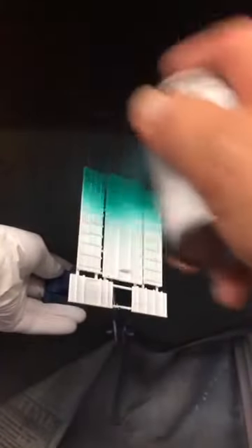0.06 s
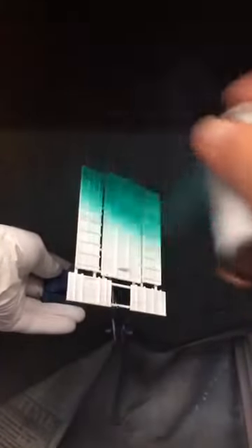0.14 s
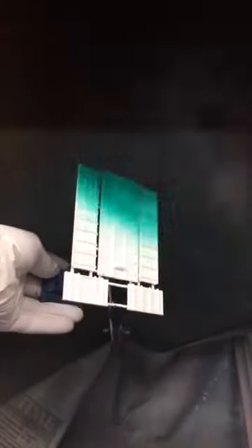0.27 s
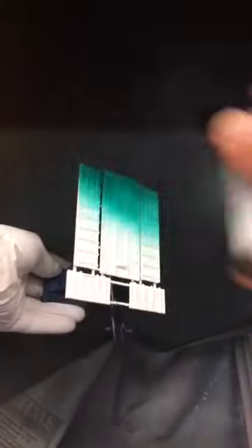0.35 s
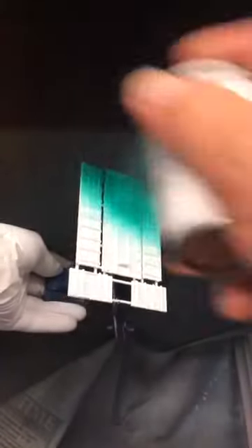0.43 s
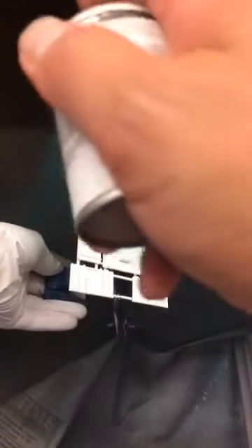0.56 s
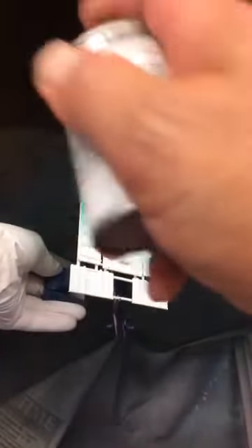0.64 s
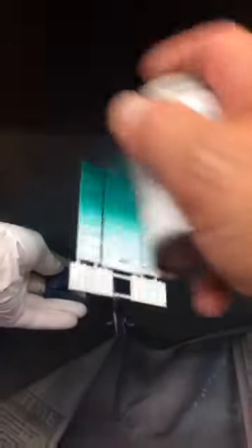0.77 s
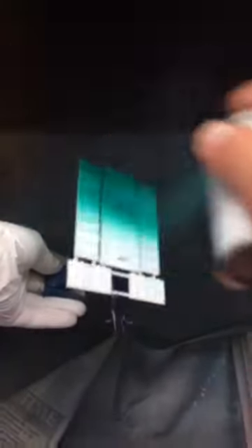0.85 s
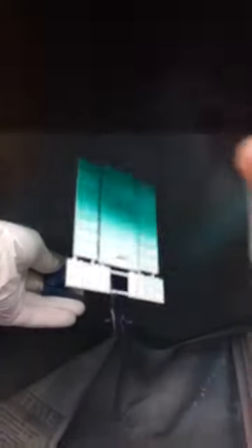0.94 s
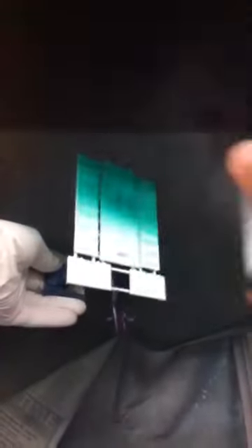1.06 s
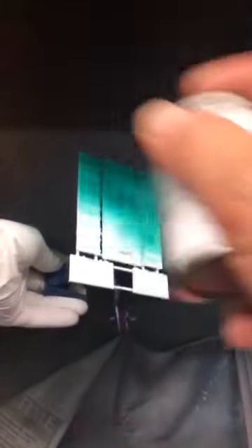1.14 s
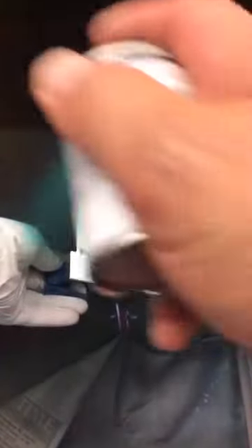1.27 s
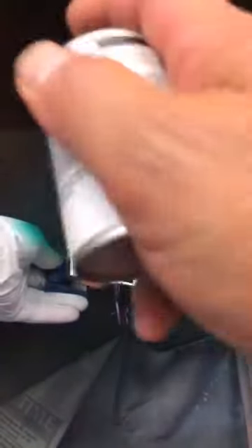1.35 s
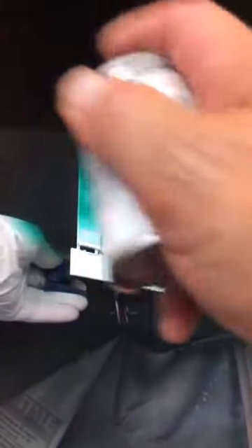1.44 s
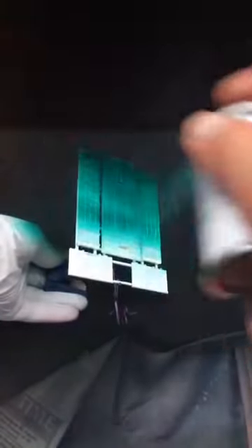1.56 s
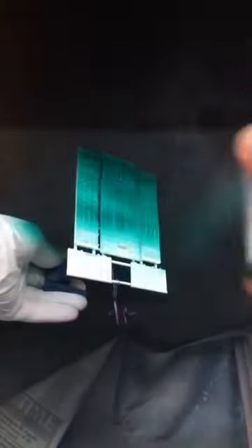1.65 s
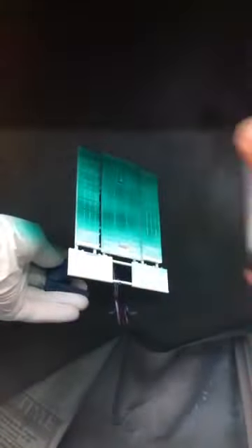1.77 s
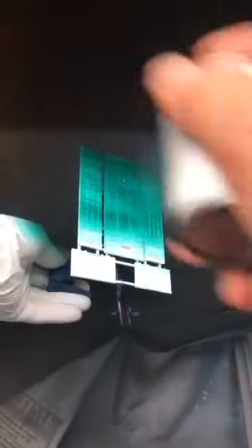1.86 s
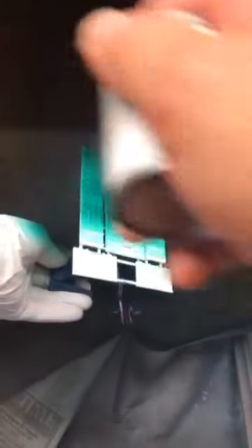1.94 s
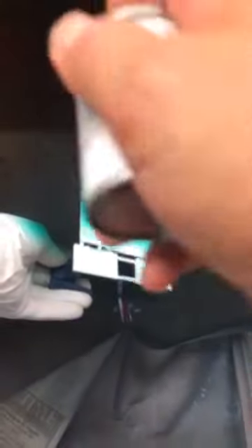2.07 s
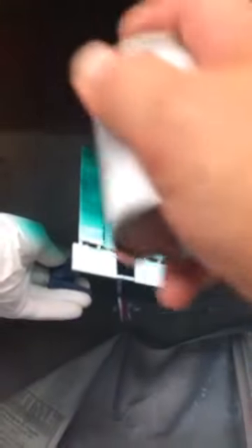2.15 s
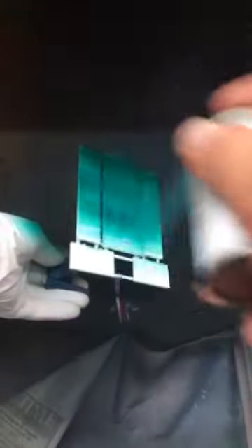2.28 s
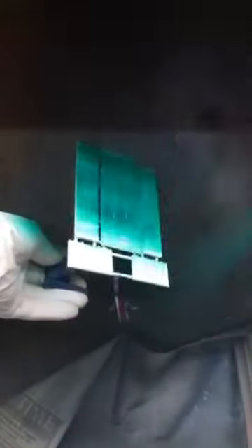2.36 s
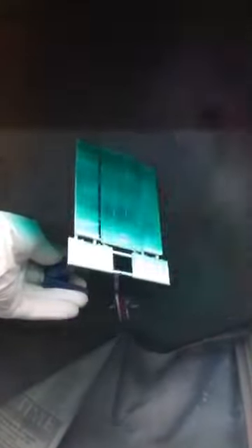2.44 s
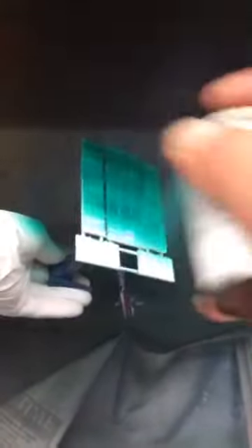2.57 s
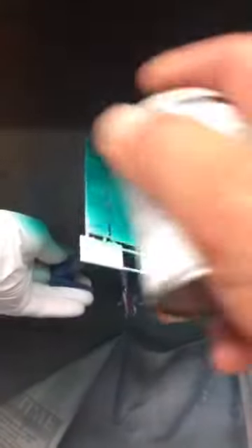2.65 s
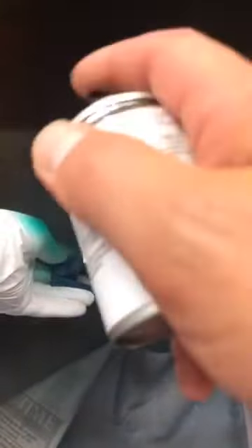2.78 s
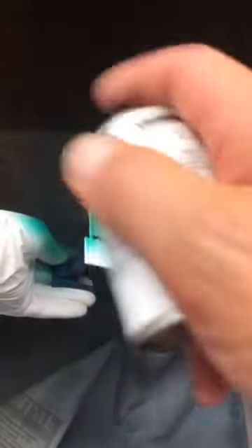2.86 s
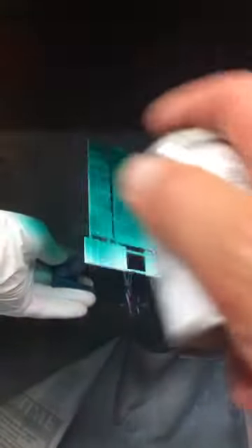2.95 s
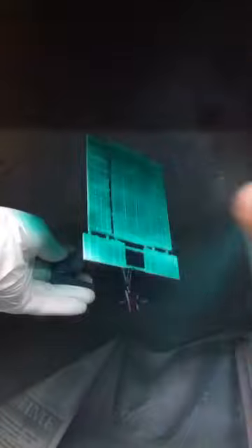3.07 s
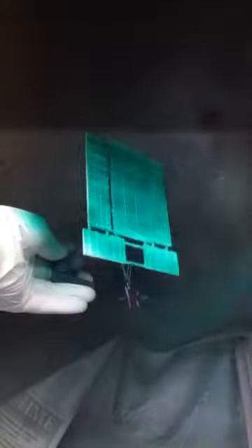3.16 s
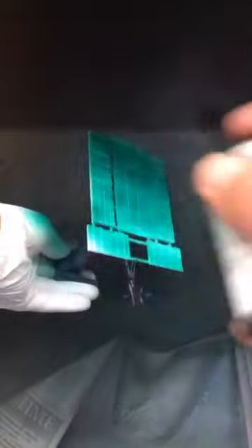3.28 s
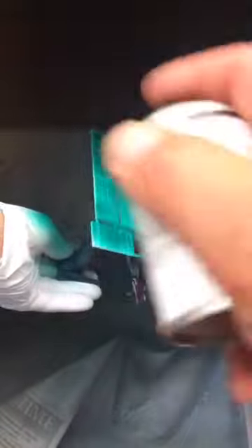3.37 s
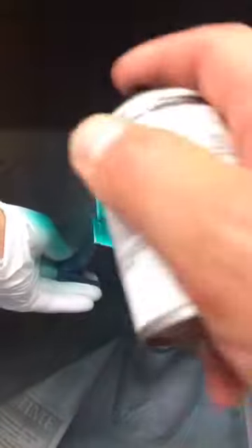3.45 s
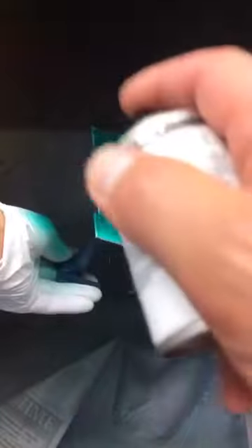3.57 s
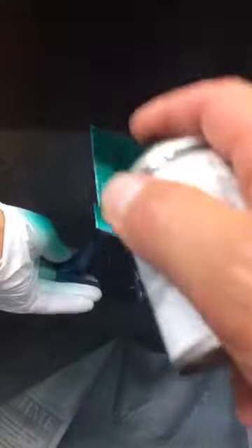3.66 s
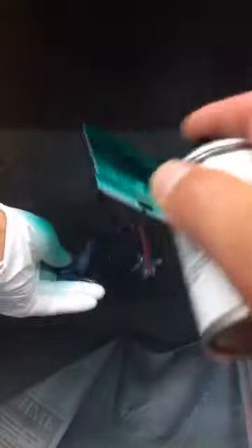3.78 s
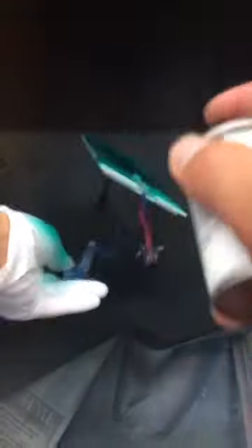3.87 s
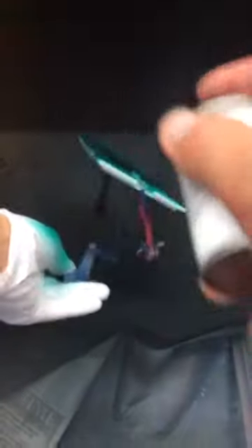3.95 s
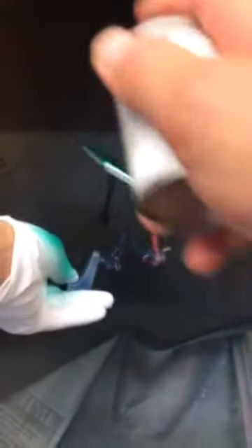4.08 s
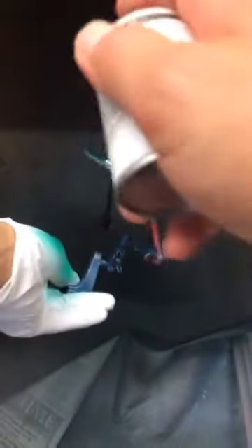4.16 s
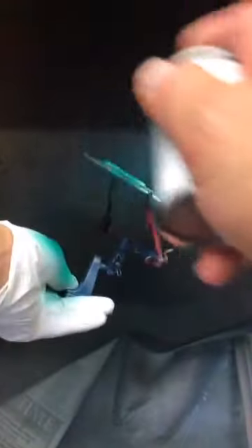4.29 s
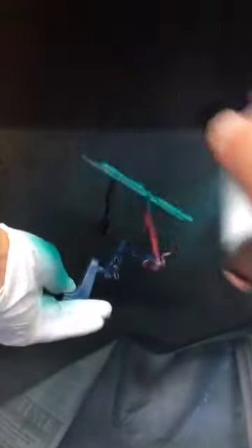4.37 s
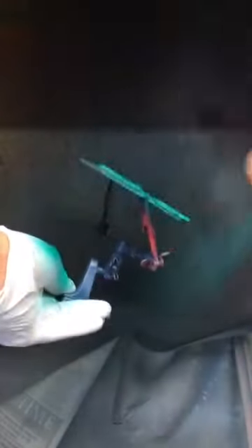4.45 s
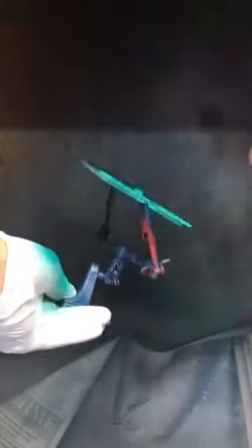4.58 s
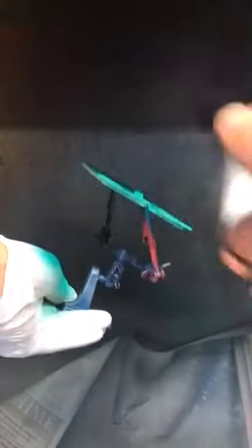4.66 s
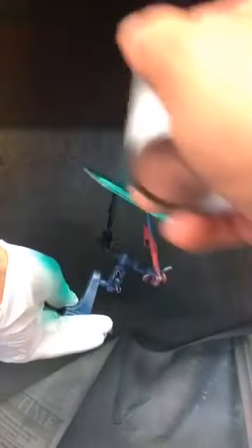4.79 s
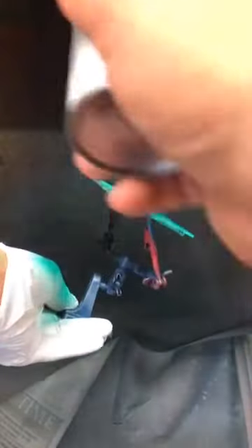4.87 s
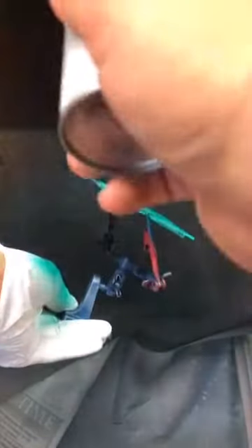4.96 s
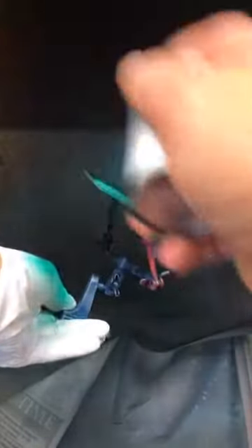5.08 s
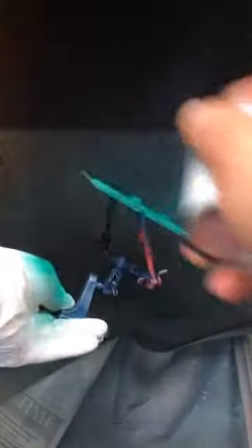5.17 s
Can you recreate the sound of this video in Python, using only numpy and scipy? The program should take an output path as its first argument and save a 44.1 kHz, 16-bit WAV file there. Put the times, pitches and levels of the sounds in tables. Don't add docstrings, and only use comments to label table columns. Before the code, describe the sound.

An aerosol paint can fires quick, even hissing bursts close by in a small booth, pausing once, over faint fan hum and distant bird whistles.

```python
import sys
import numpy as np
from scipy import signal
from scipy.fft import rfft, irfft, next_fast_len
from scipy.io import wavfile
from scipy.ndimage import uniform_filter1d, map_coordinates

SR = 44100
rng = np.random.default_rng(int(sys.argv[2]) if len(sys.argv) > 2 else 0)


def master_out(mix):
    frames = np.transpose(np.atleast_2d(mix))
    ceiling = np.clip(frames, -1, 1)
    pcm = np.round(ceiling * 32767).astype(np.int16)
    wavfile.write(sys.argv[1], SR, pcm)


def voltage_ratio(level):
    return 10 ** (np.asarray(level, float) / 20)


N = 230378

# (valve half open [s], valve half shut [s], jet hiss [dB],
# leak before opening, relative to the hiss [dB], swell over the pass [dB])
SPRAY_PRESSES = [(0.019, .235, -38, -48, -7), (0.382, 0.603, -37.5, -45, -0.5),
                 (0.766, .99, -38.5, -26, -4), (1.108, 1.341, -37.5, -41, 1.5),
                 (1.491, 1.717, -39, -45, -2.5), (1.846, 2.02, -38, -20, -0.8),
                 (2.219, 2.42, -39, -45, -3.5), (2.549, 2.747, -36.5, -25, 1.5),
                 (2.931, 3.159, -38, -18.5, -4.5), (3.296, 3.46, -36, -18, -0.5),
                 (4.195, 4.529, -38.5, -26, -2.8), (4.686, 4.891, -40.5, -30, 0.2),
                 (5.075, 5.27, -40.5, -45, -2.8)]
LEAK_S, LEAK_RISE_S = 0.02, 0.0042


def unit(x):
    return x / np.sqrt(np.mean(x ** 2) + 1e-20)


def along(points, hz):
    f, v = np.transpose(points)
    return np.interp(np.log(hz + 1), np.log(f + 1), v)


def wobble(rate):
    knots = rng.standard_normal(int(N * rate / SR) + 4)
    return map_coordinates(knots, [np.arange(N) * rate / SR])


def bumps(rows):
    t = np.arange(N) / SR
    power = sum(voltage_ratio(2 * db) * np.exp(-((t - s) / width) ** 2) for s, width, db in rows)
    return np.sqrt(power)


def filtered(x, response):
    m = next_fast_len(N + 8192)
    gain = response(np.fft.rfftfreq(m, 1 / SR))
    return irfft(rfft(x, m) * gain, m)[..., :N]


def rush(spectrum, patchy_db, grain_db=0):
    grains = rng.standard_normal(N) * voltage_ratio(grain_db * wobble(900))
    z = signal.stft(grains, nperseg=512)[2]
    patches = uniform_filter1d(rng.standard_normal(z.shape), size=5, axis=0)
    patches = uniform_filter1d(patches, size=7, axis=1)
    x = signal.istft(z * voltage_ratio(patchy_db * unit(patches)), nperseg=512)[1][:N]
    return unit(filtered(x, lambda hz: voltage_ratio(along(spectrum, hz))))


def tail(decay, seconds):
    hz, t, z = signal.stft(rng.standard_normal(int(seconds * SR)), SR, nperseg=256)
    fade_db = -60 * t / along(decay, hz)[:, None]
    x = signal.istft(z * voltage_ratio(fade_db), SR, nperseg=256)[1]
    return x / np.linalg.norm(x)


def fan():
    # (frequency [Hz], rms level [dB])
    motor_lines = [(120, -86.5), (138, -81.5), (360, -92), (480, -82.5), (585, -85.5), (720, -86),
                   (840, -94.5), (1080, -86.5), (1200, -88), (1320, -100)]
    # (frequency [Hz], density [dB per Hz])
    air_colour = [(15, -68), (25, -49), (80, -9.5), (107, -7.5), (188, -15), (227, -6.5), (390, -7),
                  (471, -10), (510, -14.5), (807, -13), (1240, -19.5), (1350, -13.5), (2070, -22.5),
                  (14000, -31), (15600, -43)]
    t = np.arange(N) / SR
    hum = np.zeros(N)
    for hz, db in motor_lines:
        gain = voltage_ratio(db + 2.5 + 1.3 * wobble(4.7))
        hum += gain * np.sin(2 * np.pi * hz * t + 0.34 * wobble(7.2))
    air_db = -70 + 0.8 * wobble(5.12)
    return hum + voltage_ratio(air_db) * rush(air_colour, patchy_db=1.5)


def bird():
    # (start [s], length [s], start pitch [Hz], end pitch [Hz], level [dB])
    whistles = [(0.173, 0.067, 1830, 1724, -55.5), (.255, 0.044, 1980, 1960, -67),
                (0.24, 0.07, 1700, 1610, -63), (.30, .1, 1610, 1566, -63), (.66, 0.1, 1050, 1150, -72),
                (1.30, 0.12, 980, 1000, -65), (1.415, 0.062, 1330, 1417, -69),
                (2.0, 0.085, 1500, 1580, -56), (2.105, 0.11, 1580, 1510, -64.5),
                (2.21, 0.048, 1500, 1500, -57), (2.291, 0.062, 1600, 1670, -63),
                (2.38, 0.062, 1724, 1715, -59), (2.46, 0.09, 1625, 1540, -64.5),
                (2.57, 0.043, 1484, 1520, -56), (3.08, 0.074, 1495, 1590, -52.5),
                (3.173, 0.13, 1578, 1517, -66), (3.415, 0.045, 1480, 1470, -57),
                (3.49, 0.064, 1516, 1550, -57.5), (3.58, 0.09, 1570, 1530, -70.5),
                (3.679, 0.077, 1550, 1567, -71), (3.654, .09, 925, 965, -66.5),
                (3.745, 0.045, 955, 935, -68), (3.81, 0.045, 954, 975, -75)]
    x = np.zeros(N + SR)
    for s, length, start_hz, end_hz, db in whistles:
        u = np.arange(int(length * SR)) / (length * SR)
        glide_hz = start_hz + (end_hz - start_hz) * u
        hz = glide_hz * (1 + 0.022 * np.sin(2 * np.pi * 65 * u * length))
        swell = np.sin(np.pi * u ** 0.45) ** 0.67
        note = np.sin(2 * np.pi * np.cumsum(hz) / SR) * swell
        note = note * (1 + 0.35 * np.sin(2 * np.pi * 55 * u * length))
        echo = signal.fftconvolve(note, tail([(900, 0.65), (2000, 0.5)], seconds=0.6))
        call = 0.6 * echo + 1.02 * np.pad(note, (0, len(echo) - len(note)))
        x[round(s * SR):][:len(call)] += voltage_ratio(db + 1.4 * wobble(45)[:len(call)]) * call
    return x[:N]


def hand():
    # (time [s], width [s], level [dB])
    glove_rubs = [
        (3.59, .02, -90),
        (3.785, .03, -77),
        (3.826, .006, -77),
        (3.859, 0.0044, -70),
        (3.91, .015, -77),
        (4.165, 0.034, -74),
    ]
    # (time [s], peak level [dB], pitch [Hz])
    clamp_ticks = [
        (3.5914, -66, 8900),
        (3.8262, -62, 7630),
        (3.8586, -66, 5800),
        (3.858, -62, 1700),
        (3.9114, -72, 8900),
        (3.9314, -67, 7790),
        (4.1514, -68, 7770),
    ]
    # (frequency [Hz], density [dB per Hz])
    skin = [(900, -120), (1500, 0), (5000, -11), (10000, -12), (15500, -22)]
    x = bumps(glove_rubs) * voltage_ratio(2.9 * wobble(60)) * rush(skin, patchy_db=-3, grain_db=0)
    t = np.arange(400) / SR
    for s, db, hz in clamp_ticks:
        tick = 0.66 * np.sin(2 * np.pi * hz * t) + 0.6 * rng.standard_normal(len(t))
        x[round(s * SR):][:len(t)] += voltage_ratio(db - 0.5 - 60 * t / 0.012) * tick
    return x


def booth(x):
    # (frequency [Hz], time to fall 60 dB [s])
    wall_decay = [(200, 0.98), (2000, 0.65), (8000, 0.35), (15000, 0.34)]
    starts = [round((press[0] - LEAK_S - LEAK_RISE_S) * SR) for press in SPRAY_PRESSES[1:]]
    cuts = [0] + starts + [N]
    out = np.zeros(N + SR)
    for a, b in zip(cuts, cuts[1:]):
        echo = signal.fftconvolve(x[a:b], tail(wall_decay, seconds=0.5))
        out[a:a + len(echo)] += echo
    return out[:N]


def valve():
    # (time from half open [s], level [dB])
    valve_opening = [
        (-.019, -53),
        (-.010, -18),
        (-.005, -9),
        (0, -8),
        (.006, -1.5),
        (.012, -1),
    ]
    # (time from half shut [s], level [dB])
    valve_closing = [
        (-.024, -1),
        (-.012, -4),
        (0, -8),
        (.008, -19),
        (.022, -27),
        (.045, -53),
    ]
    t = np.arange(N) / SR
    on, off, db, leak_db, swell_db = np.transpose(SPRAY_PRESSES)
    press = np.searchsorted((off[:-1] + on[1:]) / 2, t)
    since = t - on[press]
    progress = np.clip(since / (off - on)[press], 0, 1) - 0.5
    seep = leak_db[press] + np.interp(since, [-LEAK_S - LEAK_RISE_S, -LEAK_S, 0], [-30, 0, 1.5])
    snap = np.interp(since, *np.transpose(valve_opening), left=-90)
    opening = np.maximum(snap, np.minimum(seep, 0))
    closing = np.interp(t - off[press], *np.transpose(valve_closing), right=-90)
    return db[press] + swell_db[press] * progress, opening, closing, progress, press


def spray():
    # (frequency [Hz], density [dB per Hz])
    hiss_colour = [(2530, -30), (4300, -12), (5250, -3.5), (8080, -2), (8760, -0.5), (9810, -5),
                   (10800, -4.5), (13300, -2), (14700, 0), (15600, -11.5)]
    cone_colour = [(1120, -51), (1900, -8), (2470, -4), (2790, -3), (3800, 0), (4410, -5), (4700, 1),
                   (6110, -23.5), (10300, -120)]
    can_colour = [(310, -29), (520, -12), (564, -5.5), (692, 4.5), (864, -1), (955, 0.5), (1060, -4),
                  (1500, 3.5), (1610, 2.5), (1950, 3.5), (2100, -1), (2730, -10), (4620, -120)]
    part_colour = [(47, -51), (80, -36.5), (150, 1.5), (194, 2.5), (292, -0.5), (329, -1.5), (368, -1.5),
                   (540, -13.5), (700, -54), (1190, -120)]
    # (time [s], width [s], drumming over the hiss [dB])
    part_crossings = [(.11, 0.053, -21), (.54, .1, -22), (.84, 0.045, -20), (1.18, 0.18, -21),
                      (1.57, 0.073, -18.5), (1.95, 0.13, -19.5), (2.25, 0.067, -16.5), (2.64, .1, -22.5),
                      (2.97, 0.085, -24), (3.35, 0.11, -19.5), (4.215, 0.044, -18), (4.42, 0.1, -25.5),
                      (4.72, .09, -19.5), (5.1, 0.07, -19.5)]
    # (can [dB], cone [dB], sizzle [dB])
    finger_grips = [(-1, 0.4, 0.6), (-0.5, 0, 0.9), (0, -1, 0.1), (0, -0.8, 0.2), (0.2, -1.1, -0.5),
                    (1.1, 0.7, .3), (-0.8, 0.1, 0.6), (0, .3, 0.5), (-0.7, 0.1, .3), (-0.2, -0.2, 0.1),
                    (1, -0.4, 0.1), (2.5, -0.3, 0.9), (1.3, -0.7, 1)]
    steady_db, opening, closing, progress, press = valve()
    turned_db = steady_db + 38
    half_open, half_shut = np.clip(-np.array([opening, closing]) / 7.5, 0, 1)

    def layer_db(over_hiss_db, ignores, drift_db, opening_db, closing_db):
        level_db = over_hiss_db - ignores * turned_db + drift_db * progress
        return level_db + opening_db * half_open + closing_db * half_shut

    can_db = layer_db(-16, ignores=-0.1, drift_db=-3, opening_db=-2.5, closing_db=9)
    cone_db = layer_db(-11, ignores=0.53, drift_db=-1.5, opening_db=2, closing_db=3.5)
    sizzle_db = layer_db(1.48, ignores=0.85, drift_db=0.7, opening_db=-4.5, closing_db=-1)
    grip_db = np.transpose(finger_grips)[:, press]

    hiss = rush(hiss_colour, patchy_db=0.5, grain_db=0.5)
    sizzle = filtered(hiss, lambda hz: np.clip((hz - 9300) / 1000, 0, 1))
    hiss = hiss - sizzle + voltage_ratio(sizzle_db + grip_db[2]) * sizzle
    cone = voltage_ratio(cone_db + grip_db[1] - 0.66) * rush(cone_colour, patchy_db=1.5, grain_db=1.3)
    can = voltage_ratio(can_db + grip_db[0] - 0.62) * rush(can_colour, patchy_db=1.0)
    drumming = voltage_ratio(-33.5) + bumps(part_crossings)
    part = drumming * voltage_ratio(1.03 * wobble(38)) * rush(part_colour, patchy_db=0.0)
    flutter = 0.43 * wobble(30) + 0.5 * wobble(150)
    return voltage_ratio(steady_db + opening + closing + flutter + 0.55) * (hiss + cone + can + part)


def streaks(x, depth_db, hole_db, holes):
    z = signal.stft(x, nperseg=2048)[2]
    flicker, dropout = rng.standard_normal((2, len(z) // 4 + 1, z.shape[1]))
    gain_db = depth_db * flicker + hole_db * (dropout > holes)
    gain_db = np.repeat(gain_db, 4, axis=0)[:len(z)]
    gain_db[:24] = 0
    return signal.istft(z * voltage_ratio(gain_db), nperseg=2048)[1][:N]


def fills():
    # (time [s], low edge [Hz], high edge [Hz], level [dB])
    wide_flashes = [(0.415, 4600, 5700, -53), (.413, 10300, 11800, -51), (0.553, 6900, 9000, -47),
                    (.552, 10300, 11800, -50), (1.667, 13100, 14500, -48), (2.249, 9000, 10400, -52),
                    (4.477, 4200, 5200, -56), (4.477, 11100, 12500, -54), (4.709, 11100, 13300, -50),
                    (4.802, 13700, 15100, -48)]
    side, bump = np.zeros(N), np.hanning(2048)
    f = np.fft.rfftfreq(len(bump), 1 / SR)
    for s, low_hz, high_hz, db in wide_flashes:
        inside = (f > low_hz) & (f < high_hz)
        band = irfft(rfft(rng.standard_normal(len(bump))) * inside)
        side[round(s * SR) - len(bump) // 2:][:len(bump)] += voltage_ratio(db) * unit(band) * bump
    return np.array([side, -side])


def scene():
    jet = spray()
    mono = fan() + bird() + hand() + voltage_ratio(-17.5) * booth(jet) + jet
    return np.array([mono, mono])


def top_cut(x):
    return signal.sosfilt(signal.butter(12, 16620, fs=SR, output="sos"), x)


def record(dry):
    mono = streaks(dry[0], depth_db=3.0, hole_db=-17, holes=1.8)

    def band_limit(hz):
        return voltage_ratio(-70 * np.clip((hz - 15260) / 160, 0, 1) ** 1.5)

    mix = filtered(mono + fills(), band_limit)
    return top_cut(mix)


dry = scene()
out = record(dry)
master_out(out)
```